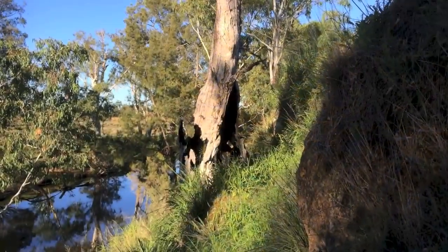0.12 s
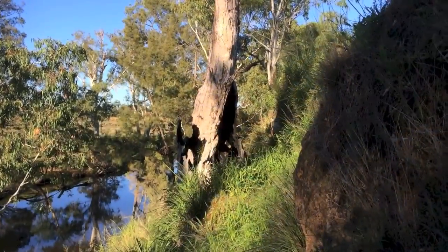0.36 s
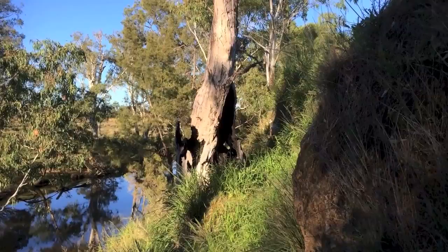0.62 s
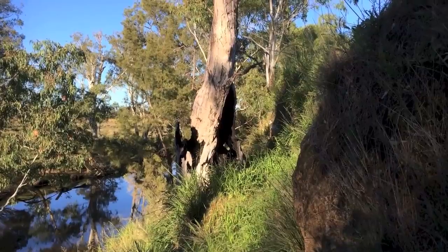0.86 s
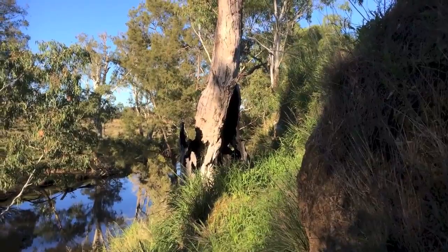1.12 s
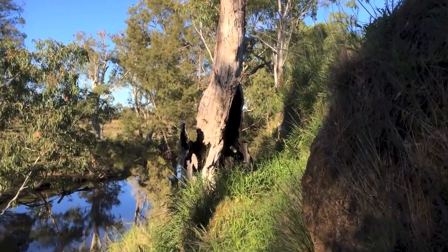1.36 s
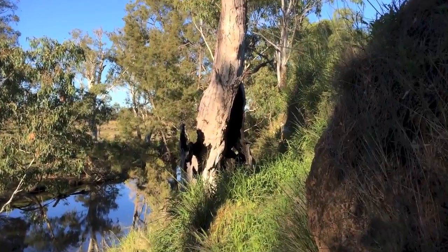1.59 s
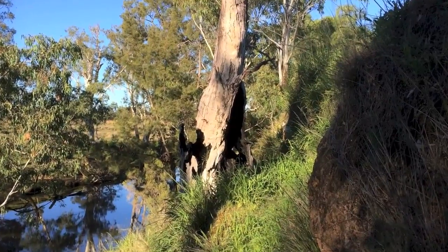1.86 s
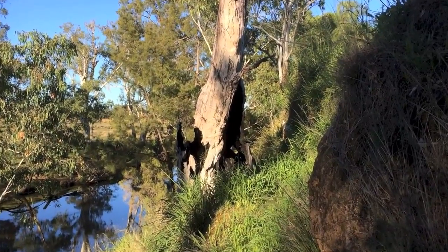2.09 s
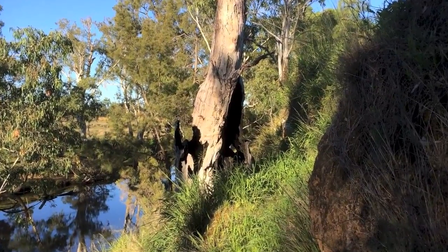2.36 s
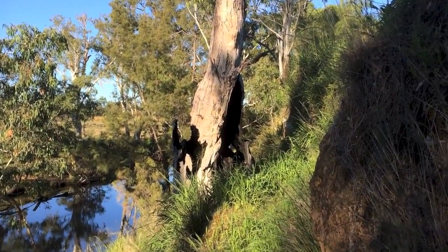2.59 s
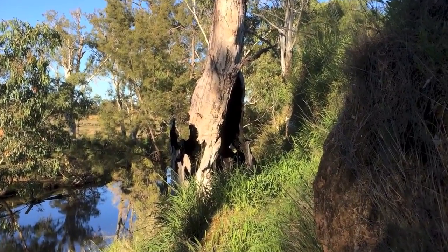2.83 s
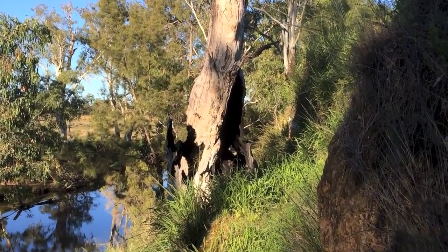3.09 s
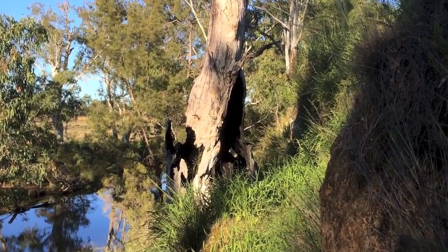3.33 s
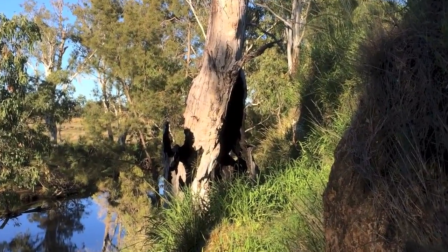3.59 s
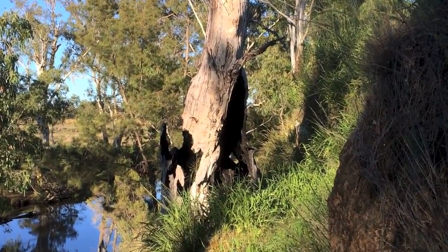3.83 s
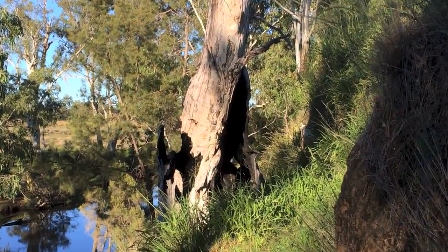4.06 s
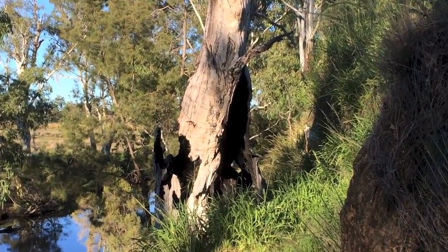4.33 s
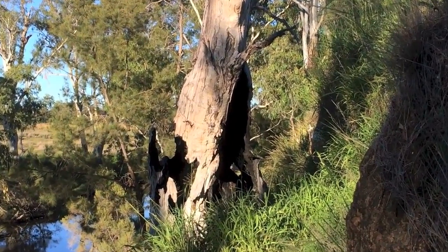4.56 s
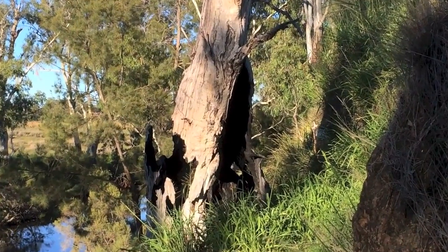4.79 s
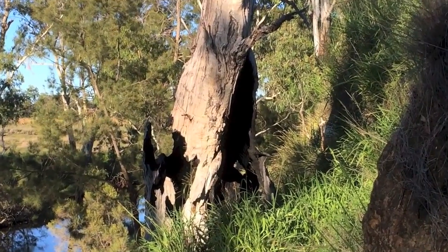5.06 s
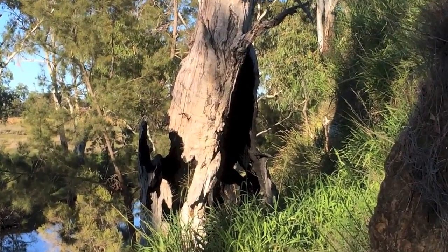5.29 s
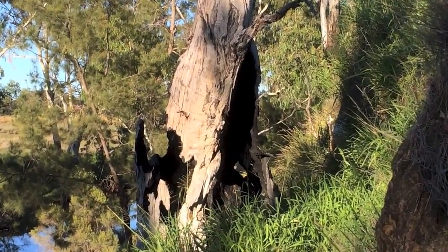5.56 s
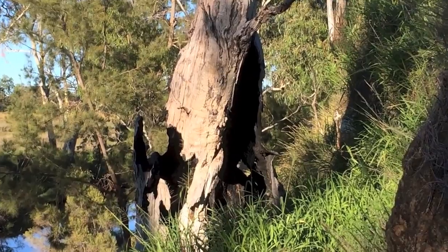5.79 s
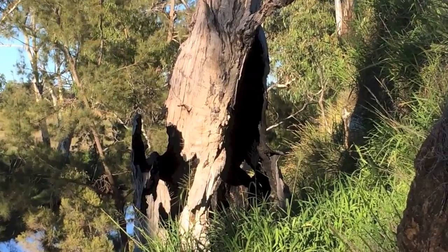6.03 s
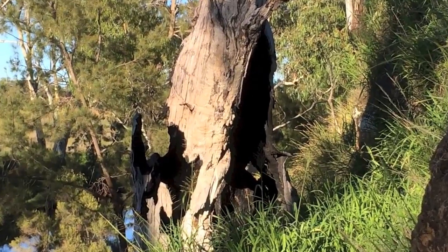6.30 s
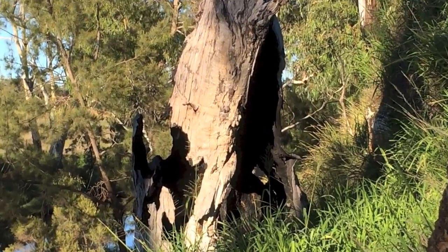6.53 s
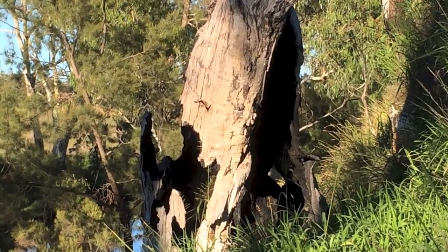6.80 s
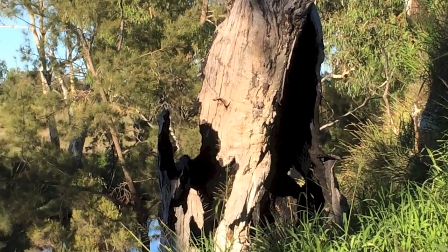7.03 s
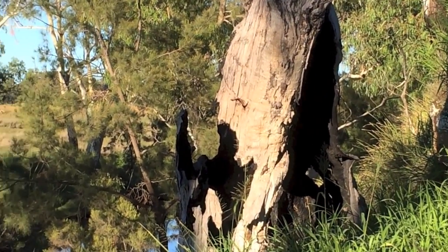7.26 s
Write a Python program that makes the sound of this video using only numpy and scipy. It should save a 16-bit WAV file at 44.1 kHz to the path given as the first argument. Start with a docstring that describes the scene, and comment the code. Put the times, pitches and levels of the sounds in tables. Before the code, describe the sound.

Raucous parrot squawks, gritty and nasal, ring through quiet riverside bushland over faint leaf rustle, cricket shimmer and a fading low hum.

```python
"""Riverside gum trees: large parrots screech, mostly a chaotic rasp of irregular snaps ringing in a throat.
At times a parrot gives a clean buzzing tone, a stack of gliding partials; small birds whistle near-pure notes.
Trunks and bank return a long soft echo, made of random taps that die away band by band.
Filtered noise makes the leaves, the insects and a low hum that fades."""
import sys
import numpy as np
from scipy import signal
from scipy.fft import rfft, irfft
from scipy.io import wavfile

SR = 44100
rng = np.random.default_rng(int(sys.argv[2]) if len(sys.argv) > 2 else 0)


def boost(x):
    """Linear amplitude factor 10**(x/20) for a level x in decibels (scalar or array-like)."""
    u = np.asarray(x, float) / 20
    return 10 ** u


def to_wav(sig):
    """Store sig (one row per channel, or 1-D mono) as 16-bit WAV at the path in sys.argv[1].

    Samples outside -1..1 are clipped; the rate is SR.
    """
    pcm = np.clip(np.atleast_2d(sig), -1, 1) * 32767
    pcm = np.round(pcm).astype(np.int16)
    wavfile.write(sys.argv[1], SR, pcm.T)  # frames by channels


N = 326340

# clean tone into which the loudest screech locks: time_s, pitch_hz, level_db (of a partial at 0 dB)
LOCKED = [(.6, 665, -46), (.635, 693, -36), (.665, 714, -30), (.76, 723, -33), (.86, 729, -33),
          (.99, 714, -34), (1.025, 702, -37), (1.045, 695, -50)]


def evened(x):
    """Scales to rms 1."""
    return x / np.sqrt(np.mean(x ** 2) + 1e-20)


def read_spectrum(points, hz):
    """Reads a curve over frequency, straight between its points on a log-frequency axis."""
    point_hz, value = np.transpose(points)
    return np.interp(np.log(hz + 1), np.log(point_hz + 1), value)


def colour(x, points):
    """Filters by a spectrum in dB."""
    hz = np.fft.rfftfreq(len(x), 1 / SR)
    return irfft(rfft(x) * boost(read_spectrum(points, hz)), len(x))


def resonate(x, hz, width_hz):
    """Moving resonance: shifts the curve hz down to zero, smooths with two equal poles, and shifts back."""
    turn = np.exp(2j * np.pi * np.cumsum(hz * np.ones(len(x))) / SR)
    pole = np.exp(-np.pi * width_hz / SR)
    smooth = signal.lfilter([1], np.poly([pole, pole]), x / turn)
    return evened((turn * smooth).real)


def drift(size, rate_hz):
    """Slow random motion of rms 1: noise smoothed by one pole."""
    return evened(signal.lfilter([1], [1, -np.exp(-2 * np.pi * rate_hz / SR)], rng.standard_normal(size)))


def add(mix, start_s, sound):
    """Mixes a sound in at its start time, with soft ends."""
    soft = sound * signal.windows.tukey(len(sound), min(1, 600 / len(sound)))
    part = mix[round(start_s * SR):][:len(sound)]
    part += soft[:len(part)]


def rasp(effort_db, lowest_hz, second_db, throat, broad_db):
    """The membranes snap at irregular moments and strengths; the throat rings with each snap."""
    # broad colour of the rasp between resonances: frequency_hz, relative level_db
    beak = [(240, -34.5), (400, -33), (1310, -9), (2020, -10.5), (2570, -3), (3950, -6), (7950, -14),
            (14000, -41.5)]
    snaps_per_s, spread_db = 2000, 1.5
    size = len(effort_db)
    chance, strength, *sides = rng.random((4, size))
    strength = boost(-spread_db * np.log(strength + 0.039))
    # the same moments and strengths, with separate random signs
    snaps, cracks = (chance < snaps_per_s / SR) * np.sign(np.array(sides) - .5) * strength

    stretch = 1 + 0.0098 * drift(size, 8)  # the neck never holds quite still
    glide = (lowest_hz / lowest_hz.mean()) ** 0.13  # the upper resonances follow a little
    modes = [(lowest_hz, *throat[0]), throat[1]]
    modes += [(hz * glide, width_hz, db) for hz, width_hz, db in throat[2:]]
    rings = []
    for hz, width_hz, db in modes:
        swell_db = 1.5 * drift(size, 7)  # each resonance comes and goes on its own
        rings.append(boost(db + swell_db) * resonate(snaps, hz * stretch, width_hz))
    rings[1] *= boost(second_db)

    broad = evened(colour(cracks, beak))  # each snap also leaves the beak as a short crack
    treble = signal.sosfiltfilt(signal.butter(2, 5000, "high", fs=SR, output="sos"), broad)
    treble_gain = np.minimum(1, boost(0.13 * (effort_db + 48)))  # effort below -48 dB is duller
    broad = broad - treble * (1 - treble_gain)
    return boost(effort_db) * evened(sum(rings) + boost(broad_db) * broad)


def screech(bird, start_s, length_s, effort_db, sag_db, from_hz, to_hz, nasal_db):
    """One envelope shape for every screech: attack, swell, release; the throat resonance glides."""
    # throats, first row: pole_width_hz, level_db (its pitch comes from the screech);
    # other rows: frequency_hz, pole_width_hz, level_db
    throat_high = [(150, -7), (2620, 240, -0.75), (3950, 230, -0.5), (5020, 400, -10), (6480, 220, -12.5),
                   (7860, 250, -18), (9800, 370, -27.5)]
    throat_low = [(130, -11), (2380, 270, 1), (650, 130, -22), (3360, 180, -7), (3720, 200, -6),
                  (4930, 260, -11)]
    # strength of the broad crack against the throat, by bird: level_db
    crack_db = {"high": 5, "low": 2.5}
    # lift of the second resonance as the beak opens and shuts, by bird: start_db, mid_db, end_db
    second_lift = {"high": (5.5, -0.5, 4), "low": (5, -1, -1)}
    # time the attack takes, by bird: attack_s
    attack_s = {"high": .1, "low": .065}
    attack_db, release_s, release_db = -25, .05, -17
    t = np.arange(max(start_s, 0), start_s + length_s, 1 / SR)
    u = (t - start_s) / length_s
    attack = attack_db * np.maximum(1 - u * length_s / attack_s[bird], 0) ** 2
    release = release_db * np.maximum(1 - (1 - u) * length_s / release_s, 0)
    swell = 3 * (np.sin(np.pi * u) - 1)  # dB, fullest in mid call
    # the rasp gives way by 1.5 dB during the locked tone
    locked = np.clip(np.minimum(t - LOCKED[0][0], LOCKED[-1][0] - t) / 0.081, 0, 1)
    effort = effort_db + attack + release + swell + sag_db * u - 1.5 * locked

    second_db = nasal_db + np.interp(u, [0, .5, 1], second_lift[bird])
    lowest_hz = from_hz + (to_hz - from_hz) * u
    throat = throat_high if bird == "high" else throat_low
    return t[0], rasp(effort, lowest_hz, second_db, throat, crack_db[bird])


def tone(rows, partials, wobble=0.00278, shimmer_db=1.8):
    """Regular beating of the membranes: a stack of partials, each swelling a little on its own."""
    # echoes off nearby trunks lift or cancel a partial as it glides through: frequency_hz, width_hz, gain_db
    standing = [(2895, 11, 6), (2910, 21.6, -10.5), (3440, 98, 2.5)]
    time_s, *curves = np.transpose(rows)
    t = np.arange(time_s[0], time_s[-1], 1 / SR)
    hz, level_db = [np.interp(t, time_s, curve) for curve in curves]
    phase = 2 * np.pi * np.cumsum(hz * (1 + wobble * drift(len(hz), 44))) / SR
    stack = 0
    for multiple, db in partials:
        lift_db = sum(gain_db * np.exp(-((multiple * hz - at_hz) / width_hz) ** 2)
                      for at_hz, width_hz, gain_db in standing)
        gain = boost(db + lift_db + shimmer_db * drift(len(hz), 3.5))
        stack += gain * np.sin(multiple * phase + 2 * np.pi * rng.random())
    return time_s[0], np.sqrt(2) * boost(level_db) * stack


def parrot_tone(start_s, length_s, from_hz, crest_hz, to_hz, level_db):
    """Rise, hold and fall of a clean call; the pitch turns at the crest."""
    crest, edge = .5, 0.31  # shares of the length: pitch crest, rise and fall
    u = np.array([0, edge, crest, 1 - edge, 1])
    hz = np.interp(u, [0, crest, 1], [from_hz, crest_hz, to_hz])
    return np.transpose([start_s + u * length_s, hz, level_db + np.array([-6, 0, 0, 0, -13.5])])


def whistle(start_s, length_s, from_hz, to_hz, peak_db, crest):
    """An S-shaped glide that swells to its peak and fades."""
    u = np.linspace(0, 1, num=25)
    hz = from_hz + (to_hz - from_hz) * np.sin(np.pi * u / 2) ** 2
    level_db = peak_db + np.interp(u, [0, crest, 1], [-10, 0, -14])
    return np.transpose([start_s + u * length_s, hz, level_db])


def leaves():
    """Leaves and far air: coloured noise with a slow random swell."""
    # spectrum of the air: frequency_hz, relative level_db
    air = [(15, -44), (25, -12.5), (79, 2), (220, -7), (592, -14), (1220, -14), (1980, -8), (2880, -19.5),
           (3390, -18), (3870, -18.5), (4430, -17), (6450, -15), (8660, -25.5), (15200, -31.5)]
    return boost(-60.5 + .8 * drift(N, 3)) * evened(colour(rng.standard_normal(N), air))


def crickets():
    """A steady insect chorus near 4 kHz: resonant noise that swells slightly at random."""
    return boost(-67 + 1.9 * drift(N, 4)) * resonate(rng.standard_normal(N), 3915, 550)


def katydids():
    """A faint chorus of resonant noise near 12.5 kHz that strengthens in bouts."""
    # bouts, added to the resting chorus: start_s, length_s, level_db
    bout_rows = [(-.2, 1.86, -76), (2.956, 1.135, -76), (5.58, 1.16, -74)]
    rest_db, edge_s = -86.5, .08
    t = np.arange(N) / SR
    bouts = sum(boost(db) * np.clip(np.minimum(t - start_s, start_s + length_s - t) / edge_s, 0, 1)
                for start_s, length_s, db in bout_rows)
    return (boost(rest_db) + bouts) * resonate(rng.standard_normal(N), 12500, 4500)


def low_hum():
    """Narrow bands of noise waver as a low hum that fades."""
    # hum bands: frequency_hz, pole_width_hz, level_db (before the fade)
    bands = [(76.6, 18.4, -68), (130.8, 11.7, -74.5), (150, 3.6, -78.5)]
    fade_db = 5.5 - 1.45 * np.arange(N) / SR
    hum = sum(boost(db) * resonate(rng.standard_normal(N), hz, width_hz) for hz, width_hz, db in bands)
    return hum * boost(fade_db)


def echo(x):
    """Taps of random sign: close ones from branches and ground, then a tail dying by band."""
    # decay among trunks and bank: frequency_hz, t60_s
    trees = [(500, 1.2), (1300, 1.1), (2500, 1.2), (4500, 1.12), (9000, 0.74)]
    early_db, late_db = -7, -13
    taps = np.zeros(SR)
    count = (SR - 101) // 20  # one tap at a random place in every 20 samples
    places = np.arange(100, SR - 20, 20) + rng.integers(0, 20, count)
    taps[places] = rng.choice([-1., 1.], count)
    early = taps * boost(-60 * np.arange(SR) / SR / 0.15)  # t60 of 0.15 s
    hz, t, bands = signal.stft(taps, SR, nperseg=256)
    dying = bands * boost(-60 * t / read_spectrum(trees, hz)[:, None])
    late = signal.istft(dying, SR, nperseg=256)[1][:SR]
    tail = boost(early_db) * early / np.linalg.norm(early) + boost(late_db) * late / np.linalg.norm(late)
    return signal.fftconvolve(x, tail)[:N]


def scene():
    """All birds share the echo of the trees; the background lies beneath."""
    # bird, start_s, length_s, effort_db, sag_db (over the call),
    # lowest throat resonance from_hz, to_hz, nasal_db (strength of the second resonance)
    screeches = [("low", -.04, .24, -39, 1, 1080, 980, -2), ("high", .475, .68, -29, -5, 1273, 1360, 3),
                 ("high", 1.885, .685, -32.5, -0.36, 1390, 1330, 0),
                 ("high", 2.62, .58, -64.5, -5.5, 1230, 1220, -4),
                 ("high", 4.14, .66, -31.5, 0, 1340, 1370, 0),
                 ("low", 4.65, .65, -33.5, -2.2, 1254, 987, -1),
                 ("low", 5.745, .675, -31.5, 0.87, 1133, 1354, 4),
                 ("high", 5.93, .7, -32.5, -0.5, 1390, 1330, 0)]
    # partials of the locked tone: multiple, level_db
    locked_partials = [(1, -20), (2, -1), (3, -11), (4, -0.5), (5, -1.5), (6, -5.5), (7, -7), (8, -10),
                       (9, -13.5), (10, -12.5), (11, -12.5), (12, -13.5), (13, -16), (14, -22.5), (15, -31),
                       (16, -27.5), (17, -27), (18, -28), (19, -26), (20, -28), (21, -36)]
    # other clean parrot tones: start_s, length_s, from_hz, crest_hz, to_hz, level_db (of a partial at 0 dB)
    tones = [(0, .19, 324, 323, 297, -39), (5.63, .23, 625, 740, 745, -66), (6.88, .39, 672, 683, 660, -65),
             (7.22, .22, 1400, 1372, 1417, -69)]
    # one list of partials for each of these tones: multiple, level_db
    tone_partials = [
        [(1, -31), (2, -16), (3, -6), (4, -17), (5, -19), (6, -15), (7, 0), (8, -7), (9, -9), (10, -6),
         (11, -13), (12, -14), (15, -13), (17, -14), (19, -10), (21, -14)],
        [(1, 0), (2, 0)],
        [(1, -11), (2, -3), (3, 0), (4, -15)],
        [(1, 0)],
    ]
    # whistles and other short pure notes: start_s, length_s, from_hz, to_hz, peak_db,
    # crest (share of the length before the peak)
    whistles = [(.02, .075, 4810, 4440, -37, .5), (.218, .067, 4680, 5250, -33, .65),
                (.308, .024, 5440, 5480, -41, .2), (.334, .03, 5480, 5480, -39, .25),
                (.36, .11, 5480, 5490, -51, .1), (1.025, .045, 4600, 4120, -31, .45),
                (2.745, .075, 4900, 4790, -60, .25), (2.86, .14, 4820, 4780, -65, .3),
                (2.9, .09, 5330, 5280, -69, .3), (3.24, .06, 1509, 1464, -68, .35),
                (5.255, .045, 540, 470, -58, .4), (5.6, .11, 4250, 3350, -63, .3),
                (7.09, .19, 2900, 2880, -70, .4)]
    birds = np.zeros(N)
    for row in screeches:
        add(birds, *screech(*row))
    add(birds, *tone(LOCKED, locked_partials))
    for row, partials in zip(tones, tone_partials):
        add(birds, *tone(parrot_tone(*row), partials))
    for row in whistles:
        overtones = [(1, 0), (2, -28)]  # multiple, dB
        add(birds, *tone(whistle(*row), overtones, wobble=.007, shimmer_db=2.5))
    background = leaves() + crickets() + katydids() + low_hum()
    return (birds + echo(birds) + background)[None]


def low_pass(x):
    """Removes everything above the highest recorded frequency."""
    return signal.sosfilt(signal.butter(12, 15360, fs=SR, output="sos"), x)


def record(dry):
    """Takes the single-channel mix as it stands."""
    return low_pass(dry)


dry = scene()
out = record(dry)
to_wav(out)
```